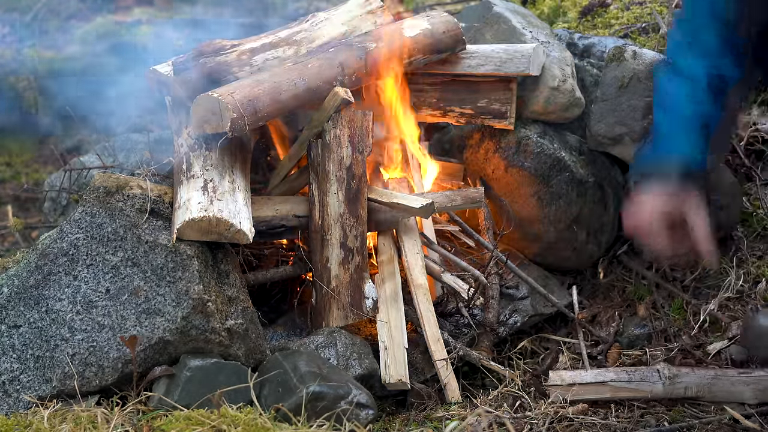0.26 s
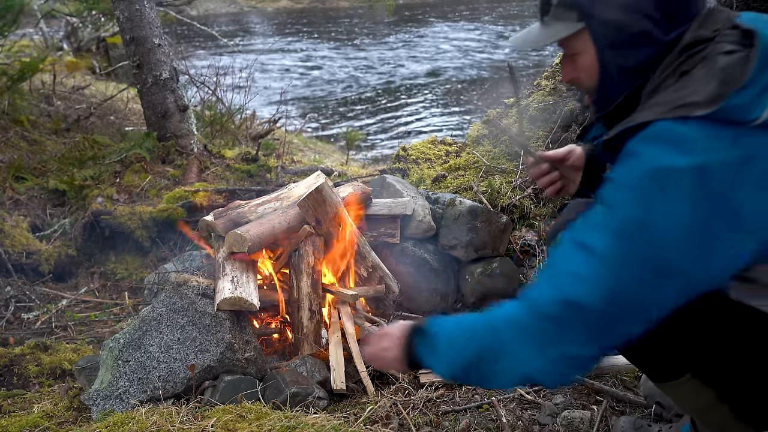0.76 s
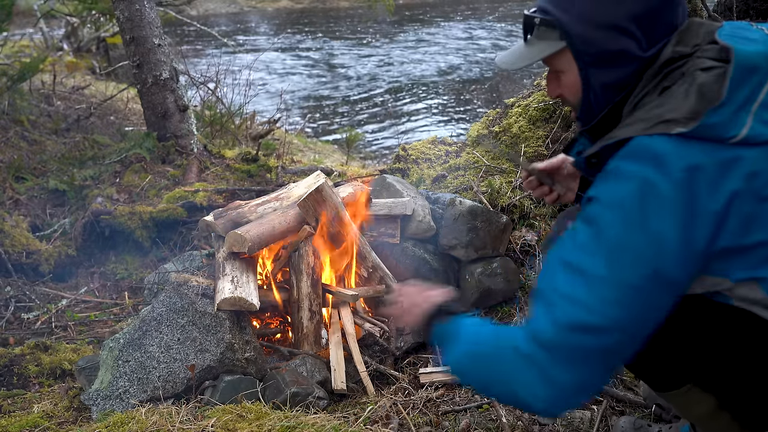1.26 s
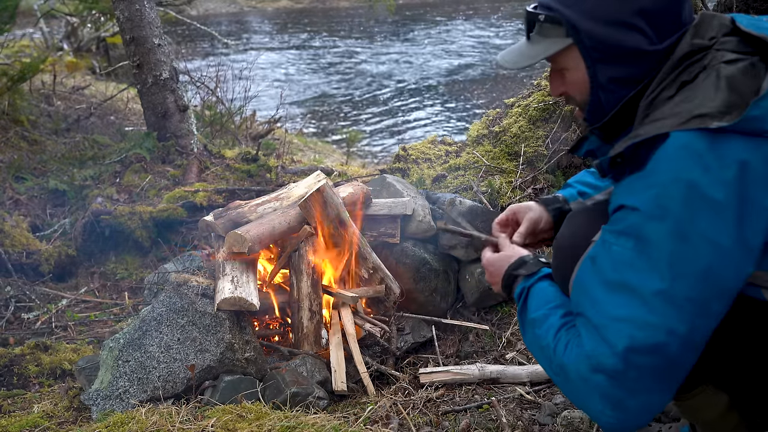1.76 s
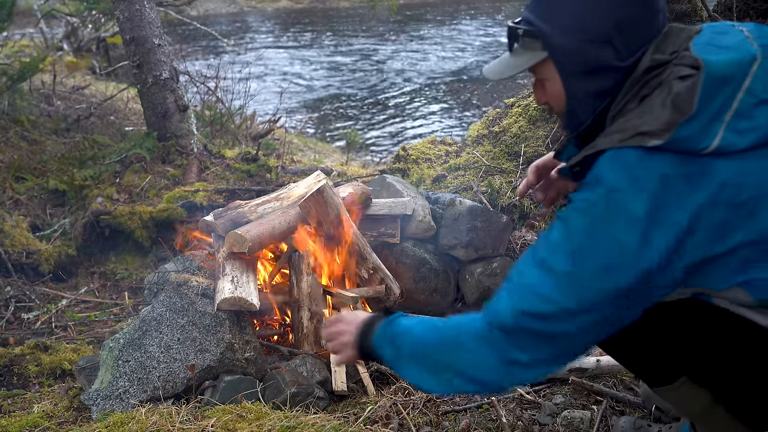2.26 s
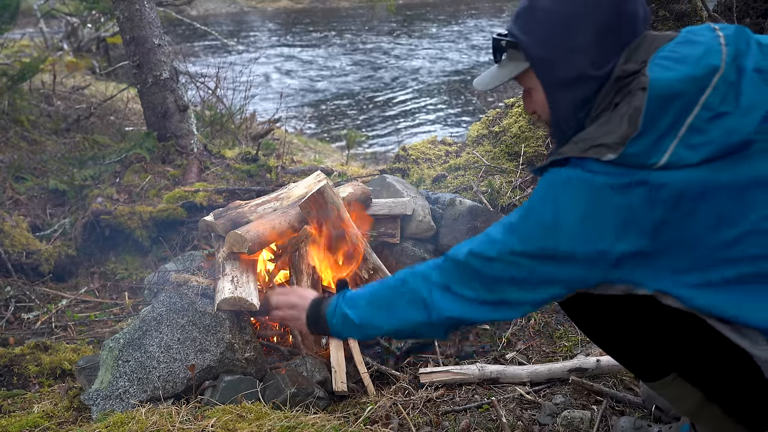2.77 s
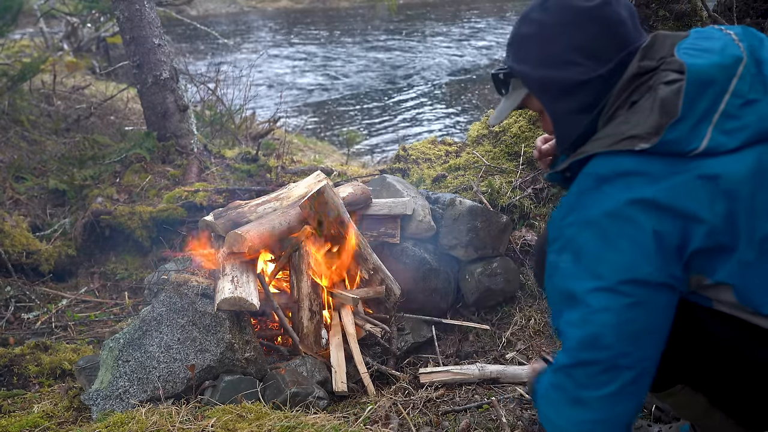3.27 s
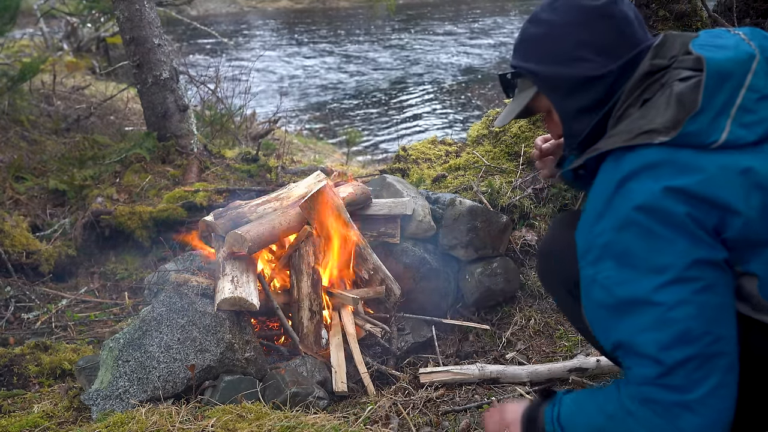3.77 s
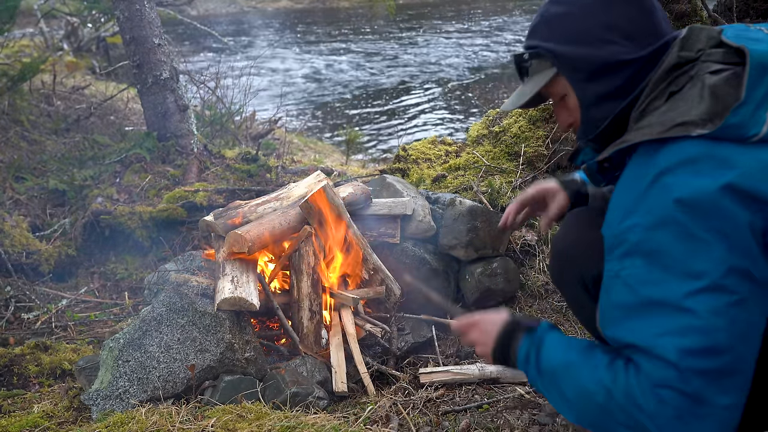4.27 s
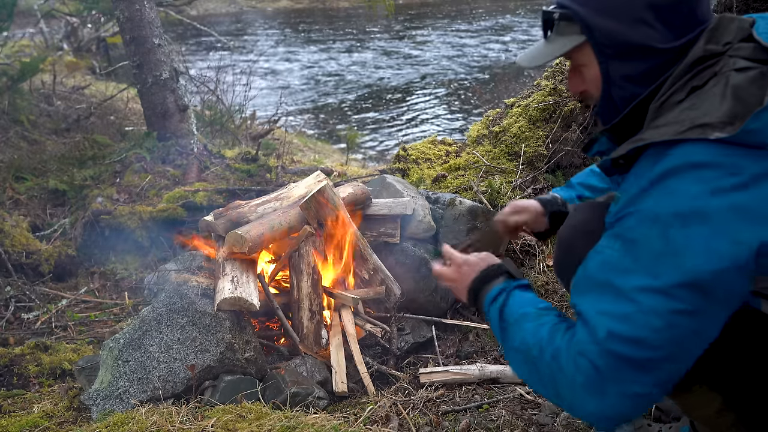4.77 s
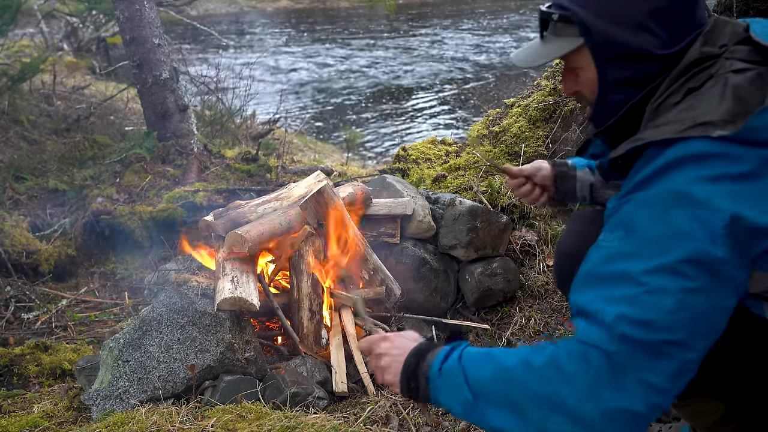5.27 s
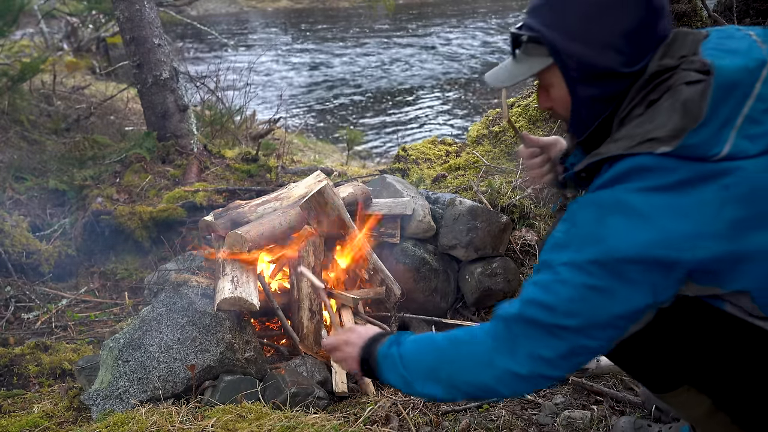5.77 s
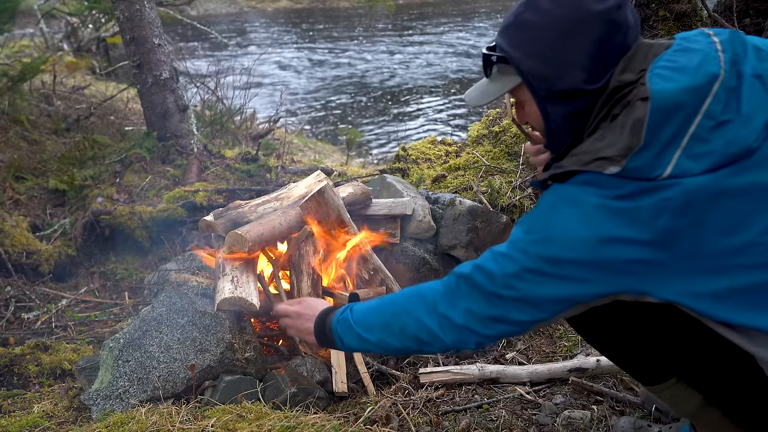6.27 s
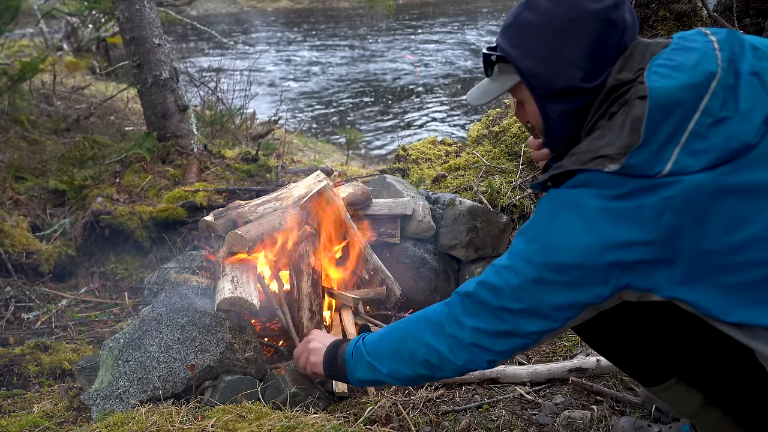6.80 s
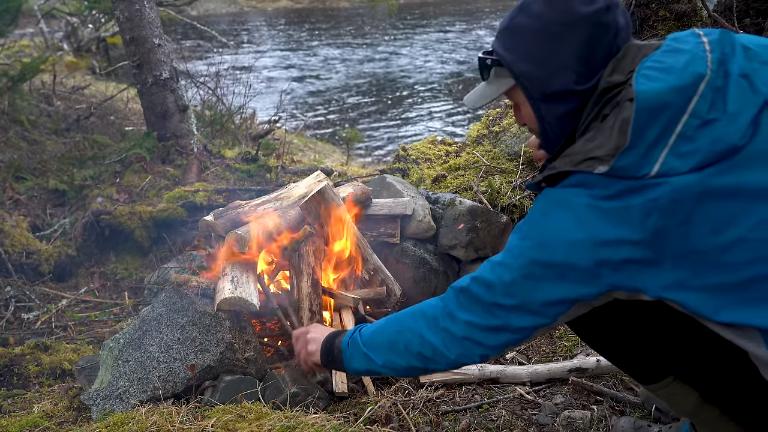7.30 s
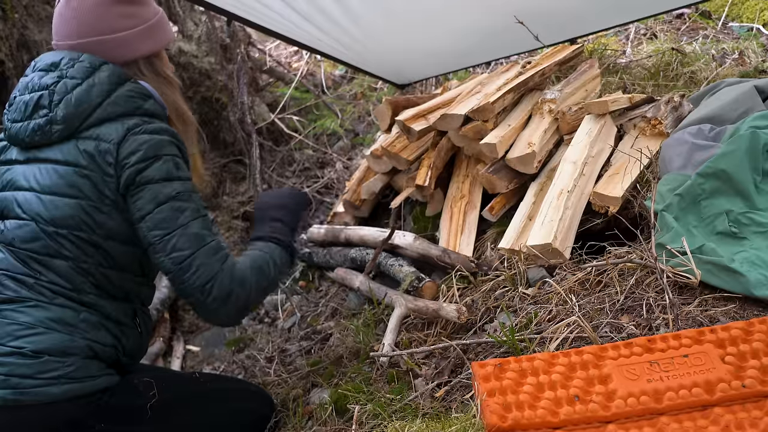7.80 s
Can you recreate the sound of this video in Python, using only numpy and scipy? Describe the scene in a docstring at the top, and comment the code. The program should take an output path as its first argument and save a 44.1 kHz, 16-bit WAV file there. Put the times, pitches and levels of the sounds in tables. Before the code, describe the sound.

A very loud dry stick snap, then a lively campfire crackling and popping over a soft river wash, with a second, quieter snap later.

```python
"""Campfire beside a river

Smooth coloured noise is the wash of river and flame; low bands are the roar of the flames and wind on the mic.
Random clicks through resonances crackle; louder pops add a woody knock, a crack and a sizzle.
A jacket rustles in short swells of hiss. A log splits and dry sticks are snapped close to a mono microphone,
the first loud enough to clip: bursts of sparse noise ring the modes of the wood."""
import sys
import numpy as np
from scipy import signal
from scipy.fft import next_fast_len
from scipy.io import wavfile
from scipy.ndimage import uniform_filter1d

SR = 44100
rng = np.random.default_rng(int(sys.argv[2]) if len(sys.argv) > 2 else 0)


def ratio_of_db(decibels):
    """Turn decibels (scalar or array-like) into linear amplitude factors; 0 dB maps to 1."""
    return 10 ** (np.asarray(decibels, float) / 20)


def int16_out(signal):
    """Quantize to a 16-bit WAV file."""
    q = np.round(np.clip(np.atleast_2d(signal).T, -1, 1) * 32767)
    wavfile.write(sys.argv[1], SR, q.astype(np.int16))


N = 354679

# liveliness of the fire: (time [s], liveliness [dB])
LIVELINESS = [(0.0, -3.5), (0.06, 7), (0.2, 1.5), (1.25, 3), (1.63, -6), (1.95, -0.5), (2.78, -1),
              (3.18, -1.5), (3.4, -3), (3.78, -1), (4.05, -5), (4.6, 1.5), (5.1, -5), (5.25, -0.5),
              (5.51, -2.5), (5.87, -0.5), (6.94, -5.5), (7.9, 3), (8.04, 3)]
# breeze: (time [s], wind on the microphone [dB], mean roar of the fanned flames [dB])
BREEZE_LEVELS = [(0.0, -46, -46), (0.06, -62, -54), (0.49, -67.5, -56.5), (1.36, -75, -59),
                 (1.63, -64, -54.5), (2.19, -74.5, -59), (2.33, -67, -56), (3.71, -73, -55.5),
                 (3.85, -61, -54.5), (3.94, -70, -58), (4.39, -59, -53), (4.72, -54, -54), (4.79, -73, -55),
                 (4.88, -49, -51), (5.01, -65, -53), (7.21, -69, -52), (7.88, -56.5, -50),
                 (8.04, -68, -57.5)]


def evened(x):
    """Scales to rms 1."""
    return x / np.sqrt(np.mean(x ** 2) + 1e-20)


def add(mix, start_s, sound):
    """Mixes a sound in at start_s."""
    part = mix[round(start_s * SR):][:len(sound)]
    part += sound[:len(part)]


def curve(table, column=1):
    """One column of a table of times, interpolated for every sample."""
    columns = np.transpose(table)
    return np.interp(np.arange(N) / SR, columns[0], columns[column])


def slow(per_s):
    """Random drift of rms 1: straight lines between per_s random knots a second."""
    knots = rng.standard_normal(400)
    return evened(np.interp(np.arange(N) / SR * per_s, np.arange(400), knots))


def colour(x, points, causal=False):
    """Filters along the last axis by a spectrum on a log-frequency axis; causal = no ringing before a click."""
    point_hz, point_db = np.transpose(points)
    hz = abs(np.fft.fftfreq(x.shape[-1], 1 / SR))
    log_gain = np.log(ratio_of_db(np.interp(np.log(hz + 1), np.log(point_hz), point_db)))
    # the Hilbert transform of the log gain gives minimum phase
    gain = np.exp(np.conj(signal.hilbert(log_gain)) if causal else log_gain)
    return np.fft.ifft(np.fft.fft(x) * gain).real


def ring(x, hz, width_hz):
    """One two-pole resonance of peak gain near 1."""
    r = np.exp(-np.pi * width_hz / SR)
    poles = [1, -2 * r * np.cos(2 * np.pi * hz / SR), r * r]
    return signal.lfilter([1 - r * r, 0, r * r - 1], poles, x) / 2


def band(x, low_hz, high_hz):
    """Band-pass, scaled to standard deviation 1 over its first 4 ms."""
    sos = signal.butter(2, [low_hz, high_hz], "bandpass", fs=SR, output="sos")
    y = signal.sosfilt(sos, x)
    return y / np.std(y[:round(0.004 * SR)])


def burst(t60_s, scatter=0.31, size=1300):
    """A cell bursts: one sharp click, then sparse decaying echoes off logs and stones."""
    t_s = np.arange(size) / SR
    echoes = scatter * rng.standard_normal(size) * (rng.random(size) < 0.08)
    x = echoes * ratio_of_db(-60 * t_s / t60_s)
    x[0] = -1
    return x


def wash():
    """Smooth noise of river and fire, fluttering a little and partly following the fire's liveliness."""
    # river and fire: (frequency [Hz], density [dB per Hz])
    wash_spectrum = [(15, -35.5), (25, -16.5), (113, -1), (205, 0.5), (307, -4), (459, -1.5), (512, 0),
                     (1280, -4), (3290, -11), (5060, -17.5), (6280, -25.5), (9400, -32.5), (13700, -36),
                     (15700, -45)]
    noise = evened(colour(rng.standard_normal(next_fast_len(N)), wash_spectrum))[:N]
    flutter_db = 1.27 * slow(per_s=25)
    return noise * ratio_of_db(-47.5 + flutter_db + 0.4 * curve(LIVELINESS))


def roar():
    """Low flutter of the flames, swelling with the draught."""
    low = signal.butter(2, [50, 260], "bandpass", fs=SR, output="sos")
    noise = evened(signal.sosfilt(low, rng.standard_normal(N)))
    flutter_db = 1.5 * slow(per_s=7.3)
    return noise * ratio_of_db(curve(BREEZE_LEVELS, column=2) + flutter_db)


def wind():
    """Lumpy wind pressure on the capsule, mostly below 50 Hz."""
    low = signal.butter(2, [18, 48], "bandpass", fs=SR, output="sos")
    return evened(signal.sosfilt(low, rng.standard_normal(N))) * ratio_of_db(curve(BREEZE_LEVELS, column=1))


def rustle(size=8192):
    """A jacket rustles: soft, sputtering swells of bright hiss."""
    # rustles: (time [s], length [s], level before swell and sputter [dB])
    rustles = [(4.045, 0.085, -50), (4.68, 0.11, -59), (5.7, .04, -71), (0.86, 0.035, -62.5)]
    # hiss: (frequency [Hz], density [dB per Hz])
    rustle_spectrum = [(2500, -27), (4600, 1), (6500, -10), (8800, -9), (11000, -17), (15500, -22)]
    out = np.zeros(N)
    for start_s, length_s, level_db in rustles:
        sputter_db = 1.5 * evened(uniform_filter1d(rng.standard_normal(size), size=150))
        hiss = evened(colour(rng.standard_normal(size), rustle_spectrum))[:round(length_s * SR)]
        swell = np.hanning(len(hiss)) ** 1.1
        add(out, start_s, ratio_of_db(level_db) * hiss * swell * ratio_of_db(sputter_db)[:len(hiss)])
    return out


def crackle(spots=24):
    """Many small cells burst in clumps; each of a set of spots has its own pitch; a few bursts are large."""
    # filter on the clicks: (frequency [Hz], gain [dB])
    crackle_spectrum = [(300, -23.5), (700, 7), (1500, 3), (3000, 2), (5000, -8.5), (8000, -16),
                        (15000, -47)]
    base_per_s, level_db = 500, -50
    chance = base_per_s / SR * ratio_of_db(3.0 * slow(per_s=40) + curve(LIVELINESS))
    size_db = 5.76 * np.minimum(rng.exponential(1, N), 3.2)
    sizes = ratio_of_db(size_db) * (rng.random(N) < chance)
    spot = rng.integers(0, spots, N)
    out = np.zeros(N)
    for k, hz in enumerate(np.geomspace(600, 7000, spots)):
        click = burst(0.014, size=2048)
        click = evened(ring(click, hz, 1.17 * hz) + 0.65 * click)
        click = colour(click, crackle_spectrum, causal=True)
        out += signal.oaconvolve(sizes * (spot == k), click)[:N]
    return ratio_of_db(level_db) * evened(out)


def small_pops(count=85):
    """Rows like loud_pops at random moments, more often low-pitched, louder when the fire is lively."""
    # knock, crack, sizzle
    typical_db, spread_db = (-48, -49, -66.5), (5, 2.5, 4.5)
    low_hz, high_hz = 547, 2600
    when, pitch = rng.random((count, 2)).T
    db = typical_db + np.abs(spread_db) * np.clip(rng.standard_normal((count, 3)), -2, 1.4)
    db += 0.5 * curve(LIVELINESS)[(when * N).astype(int), None]
    knock_hz = low_hz * (high_hz / low_hz) ** pitch ** 1.5
    return np.c_[when * N / SR, db[:, 0], knock_hz, db[:, 1:]].tolist()


def pops():
    """Larger bursts: a dull woody knock, the crack of the splitting grain and a bright sizzle."""
    # loudest pops, levels over the first 4 ms:
    # (time [s], knock [dB], knock pitch [Hz], crack [dB], sizzle [dB])
    loud_pops = [(0.1141, -40, 824, -45, -64), (0.5731, -41.5, 770, -47, -65.5),
                 (0.5907, -37.5, 1160, -49, -67.5), (0.6233, -48, 950, -44.5, -62),
                 (0.6378, -47, 650, -51, -70.5), (0.7652, -42.5, 900, -40.5, -51),
                 (0.8091, -39, 1210, -45, -64.5), (1.0066, -39, 2330, -46, -57),
                 (1.0436, -39, 815, -42, -55), (1.0765, -48, 1850, -42, -62.5),
                 (1.1175, -49, 2410, -38.5, -45.5), (1.1788, -40, 1080, -49, -70.5),
                 (1.1868, -37, 1070, -45, -68.5), (1.2715, -39, 1280, -34, -42.5),
                 (1.288, -55, 2500, -52, -60), (1.3368, -37, 810, -46, -63.5), (1.63, -43.5, 520, -44, -60),
                 (1.887, -48, 2200, -43.5, -50), (1.925, -45, 1160, -48, -65.5),
                 (1.961, -42, 650, -54, -68), (2.0014, -45, 730, -48, -70), (2.0908, -43, 900, -50, -68.5),
                 (2.4259, -47, 677, -46, -65.5), (2.0505, -41, 556, -41.5, -62),
                 (2.0653, -39, 1380, -46, -70.5), (2.3774, -40.5, 570, -47.5, -60),
                 (2.731, -32, 950, -55, -73), (2.803, -36.5, 1250, -43.5, -55),
                 (2.8615, -35.5, 1280, -40, -65.5), (2.923, -42.5, 2840, -51, -63.5),
                 (3.188, -44, 1200, -46, -64), (3.2258, -40, 1200, -48, -65), (3.2293, -38, 1500, -54, -68),
                 (3.2345, -39, 1500, -54, -66), (3.264, -43.5, 864, -50, -68.5),
                 (3.3115, -36.5, 1630, -41, -64), (3.3406, -42, 3030, -51, -64),
                 (3.344, -42, 2000, -47.5, -61.5), (3.369, -46, 1940, -42, -66.5),
                 (3.4203, -49.5, 520, -47, -64), (3.5377, -43.5, 730, -50, -64),
                 (3.7166, -39.5, 1050, -49, -66.5), (3.724, -46, 990, -43.5, -67.5),
                 (3.7654, -45, 1170, -51, -66), (3.7777, -36, 1420, -41, -61), (3.87, -52, 1500, -54, -63),
                 (3.9297, -48, 1220, -46.5, -60), (3.9849, -45, 1140, -46, -68),
                 (4.003, -46, 2000, -55, -66), (4.168, -42.5, 1500, -52, -64), (4.224, -48, 2500, -55, -69),
                 (4.305, -42, 2970, -46, -67), (4.359, -44, 2970, -49, -57),
                 (4.3947, -49, 2820, -34, -42.5), (4.446, -50, 520, -50, -66), (4.5753, -40, 820, -42, -61),
                 (4.812, -38, 1250, -52, -63), (4.889, -46, 780, -45.5, -70),
                 (5.0502, -44, 2700, -44.5, -72.5), (5.198, -43, 1610, -42, -61),
                 (5.3142, -41, 1420, -44.5, -57), (5.4277, -36, 1340, -38, -46.5),
                 (5.6382, -41.5, 1160, -47, -63.5), (5.674, -57, 780, -48, -55),
                 (5.992, -67, 2900, -40, -64), (6.1733, -43.5, 2630, -48, -69.5),
                 (6.1836, -50, 520, -47.5, -54), (6.2723, -42, 1640, -40.5, -64),
                 (6.3229, -48, 520, -44, -44), (6.5438, -38, 1190, -50, -69.5),
                 (7.2093, -39, 993, -44.5, -72), (7.3095, -40.5, 2630, -51, -64),
                 (7.3278, -37.5, 1700, -41, -53), (7.5999, -39, 2880, -50, -57),
                 (7.654, -39.5, 1120, -49, -69.5), (7.7105, -41, 860, -58, -75),
                 (7.753, -40, 960, -56, -61.5), (7.8924, -49, 1230, -46, -67),
                 (7.955, -44.5, 730, -45.5, -57), (7.978, -39.5, 1290, -45, -68.5)]
    shortest_s, longest_s = 0.008, 0.022  # echo T60 of knock and crack
    out = np.zeros(N)
    for start_s, knock_db, hz, crack_db, sizzle_db in loud_pops + small_pops():
        t60_s = shortest_s * (longest_s / shortest_s) ** rng.random()
        click = burst(t60_s, scatter=0.29)
        woody = ring(click, hz, 0.63 * hz) + 0.016 * click
        knock = band(woody, 400, 3200)
        crack = band(signal.lfilter([1], [1, -0.6], click), 2260, 4770)  # falls off towards the treble
        dull = np.clip((crack_db - sizzle_db) / 16, 0, 0.9)  # a weak sizzle also reaches less high
        hiss = signal.lfilter([1], np.poly([dull, dull, dull]), burst(0.7 * t60_s, scatter=1.0))
        sizzle = band(hiss, 6300, 15000)
        add(out, start_s, ratio_of_db(knock_db) * knock + ratio_of_db(crack_db) * crack + ratio_of_db(sizzle_db) * sizzle)
    return out


def torn_wood(tears, modes, size=8000):
    """Fibres tear in a quick uneven run and ring the wood; stones and trees return a short, duller tail."""
    out = np.zeros(N)
    t_s = np.arange(size) / SR
    for start_s, length_s, level_db, tilt_db, favoured_hz in tears:
        onset = np.minimum(t_s / 0.00021, 1)
        fibres = rng.standard_normal(size) * (rng.random(size) < 0.3) * onset
        late_s = np.maximum(t_s - length_s, 0)
        sound = 0
        for hz, width_hz, mode_db in modes:
            octaves = np.log2(hz / 3500)
            # the place of the break favours a mode
            favoured_db = 7.0 * np.exp(-(np.log2(hz / favoured_hz) / 0.22) ** 2)
            shape = ratio_of_db(-60 * late_s / 0.006)
            shape = shape + ratio_of_db(-10 - 2.5 * octaves - 60 * late_s / 0.014)
            shape = shape + ratio_of_db(-20 - 2.3 * octaves - 60 * late_s / 0.1)
            rung = ring(ring(fibres * shape, hz, width_hz), hz, 6.4 * width_hz)
            share = np.sqrt(width_hz) / np.std(rung[:round((length_s + 0.002) * SR)])
            sound += ratio_of_db(mode_db + tilt_db * octaves + favoured_db) * share * rung
        add(out, start_s, ratio_of_db(level_db) * sound / np.std(sound[:round((length_s + 0.0005) * SR)]))
    return out


def log_splits():
    """A burning log splits: its tearing fibres ring the modes of the log."""
    # tears: (time [s], length [s], level [dB], tilt [dB per octave], favoured pitch [Hz])
    splits = [(1.1513, 0.00116, -21, 0, 1630), (1.1535, .003, -31, 0, 3900)]
    # modes: (frequency [Hz], width [Hz], density before tilt and favour [dB per Hz])
    log_modes = [(1500, 340, 0), (1920, 330, -2), (2700, 540, -14), (3730, 530, -2.5), (4500, 470, -12),
                 (7440, 1200, -13), (9200, 700, -27), (12800, 1200, -32)]
    return torn_wood(splits, log_modes)


def stick_snaps():
    """Dry sticks are snapped: runs of tears ring the modes of a stick."""
    # tears: (time [s], length [s], level [dB], tilt [dB per octave], favoured pitch [Hz])
    tears = [(0.0117, .0013, -3.5, 6.5, 3700), (0.0127, 0.0034, -8, -1.5, 3660),
             (0.0253, 0.00061, -15, 4, 4500), (0.0268, 0.0024, -13, -0.5, 2600),
             (0.0519, 0.002, -29.5, 5.5, 3500), (0.054, 0.0064, -31, -10, 3400),
             (5.1451, .0008, -20, 3, 4200), (5.1471, 0.0015, -22, -4.5, 3550),
             (5.1591, 0.0025, -21.5, -2.5, 2000), (5.1627, 0.0033, -28.5, -2, 3830),
             (5.1707, 0.0054, -23, 3, 2300), (5.175, 0.002, -19, 3.5, 5670),
             (5.177, 0.0023, -20, 1.5, 3530)]
    # modes: (frequency [Hz], width [Hz], density before tilt and favour [dB per Hz])
    stick_modes = [(900, 490, -24), (1590, 630, -3), (2000, 550, -6), (2387, 220, 1.5), (3503, 670, 4.5),
                   (4200, 560, -4), (5020, 800, -2.5), (6160, 330, -6.5), (7960, 1520, -4),
                   (8630, 1400, -21.5), (10230, 1500, -13.5), (11480, 1000, -18), (12800, 1400, -19.5)]
    return torn_wood(tears, stick_modes)


def scene():
    """One microphone feeds both channels; it dulls the top treble."""
    background = wash() + roar() + wind() + rustle()
    fire = crackle() + pops() + log_splits()
    mono = background + fire + stick_snaps()
    mono = signal.sosfilt(signal.butter(4, 15000, fs=SR, output="sos"), mono)
    return np.array([mono, mono])


def low_pass(x):
    """Removes everything above the highest recorded frequency."""
    return signal.sosfilt(signal.butter(12, 15840, fs=SR, output="sos"), x)


def record(dry):
    """Each channel adds its own amplifier noise; the converter clips."""
    # amplifier noise: (frequency [Hz], density [dB per Hz])
    noise_spectrum = [(20, 25.5), (100, 14.5), (300, 9), (700, 4.5), (2000, -4.5), (16000, 9.5)]
    noise = evened(colour(rng.standard_normal((2, next_fast_len(N))), noise_spectrum))[:, :N]
    mix = np.clip(dry + ratio_of_db(-69.5) * noise, -1, 1)
    return low_pass(mix)


dry = scene()
out = record(dry)
int16_out(out)
```